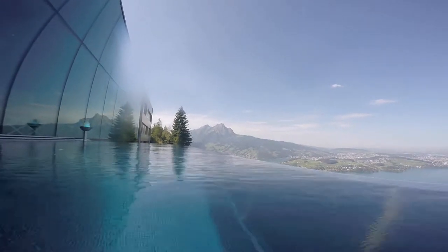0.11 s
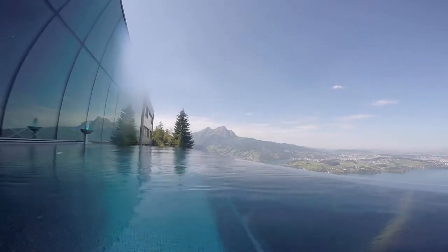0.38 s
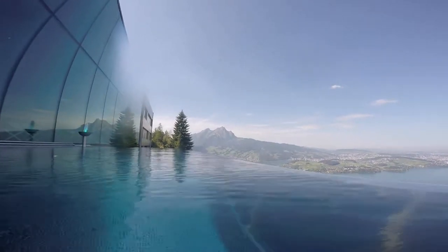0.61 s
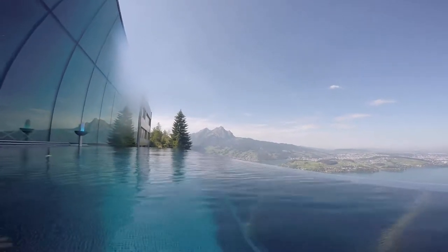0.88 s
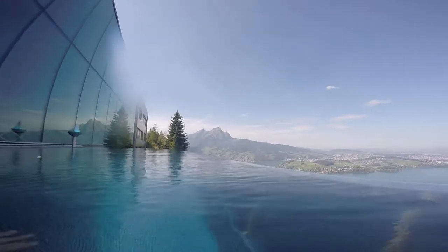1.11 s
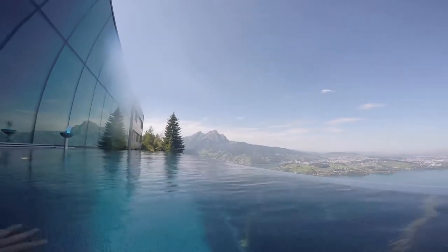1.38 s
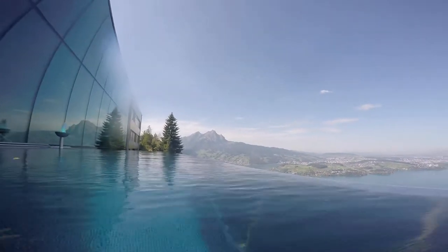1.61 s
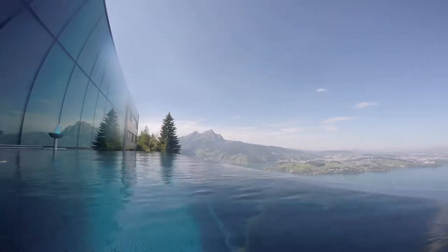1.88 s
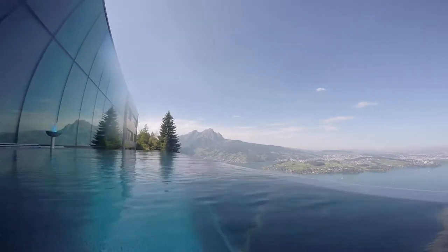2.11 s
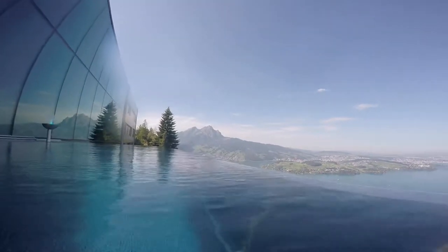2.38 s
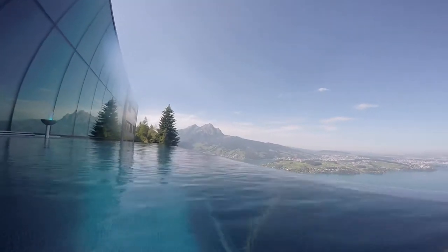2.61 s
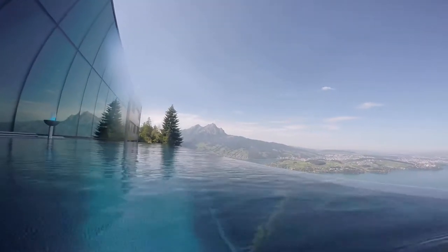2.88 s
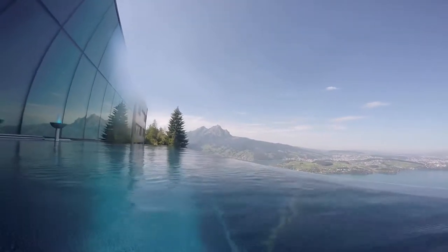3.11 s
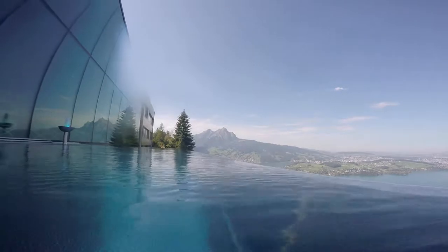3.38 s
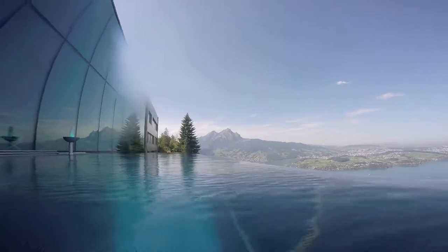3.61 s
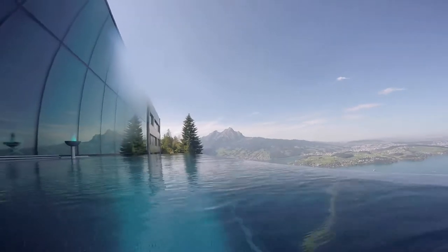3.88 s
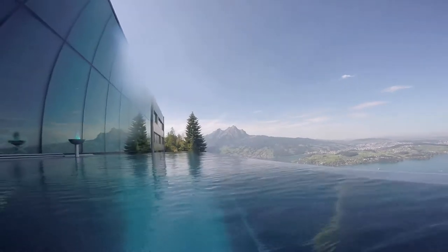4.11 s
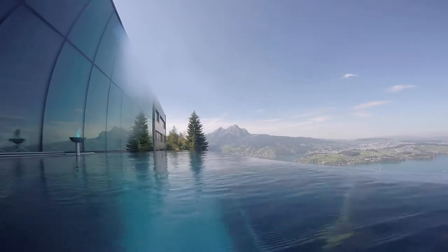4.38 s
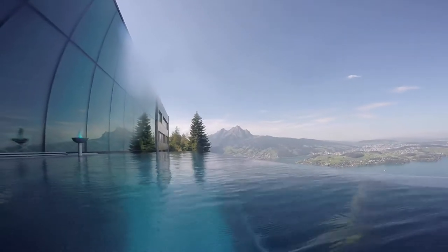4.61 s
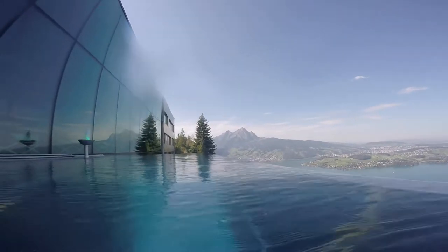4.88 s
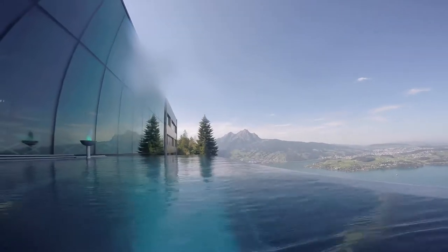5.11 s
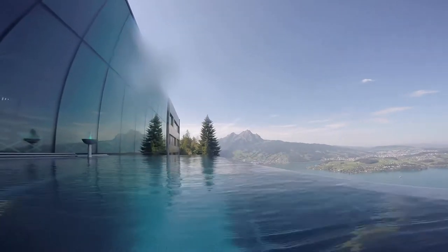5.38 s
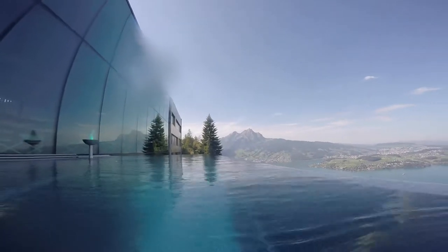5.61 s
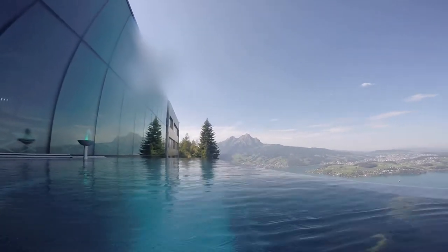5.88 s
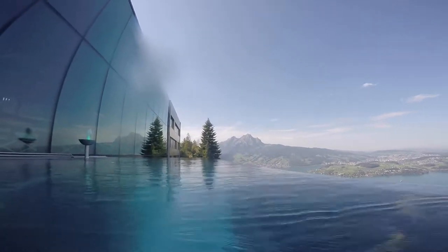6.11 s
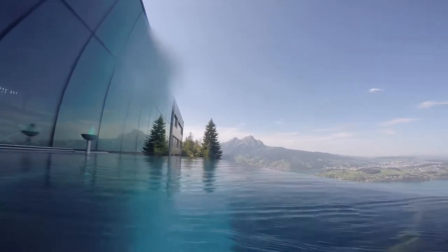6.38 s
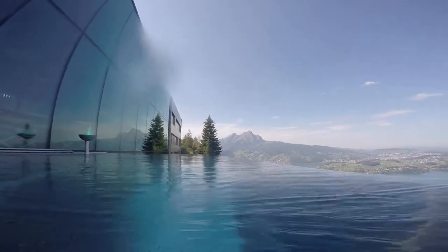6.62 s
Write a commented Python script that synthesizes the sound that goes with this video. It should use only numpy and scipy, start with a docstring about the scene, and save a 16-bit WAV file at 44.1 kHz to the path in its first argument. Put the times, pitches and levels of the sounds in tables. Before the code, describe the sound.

Quiet water spills steadily and fizzes lightly, heard close through a plastic camera case in mono. Single plinking drips and short crackly ticks come irregularly. The hand-held case rocks with deep, quickly damped thuds, sparse at first, a firmer one near the middle, then many in the last second. Grainy wet skin rubs sound on the plastic late, the strongest just after six seconds, over dim low hum and soft hiss.

```python
"""An outdoor pool, heard at the water line by a small camera's microphone in a sealed plastic housing.
Water over the far edge is patchy noise with tiny ringing bubbles; drips are single bubbles, ticks short crackles.
The hand-held housing rumbles as low noise, is nudged (damped low sines) and rubbed (grainy noise through its modes).
Behind it lie a low wavering hum and, from the electronics, smooth hiss and a thin whine of steady sines."""
import sys
import numpy as np
from scipy import signal
from scipy.fft import rfft, irfft, next_fast_len
from scipy.io import wavfile
from scipy.ndimage import uniform_filter1d, map_coordinates

SR = 44100
rng = np.random.default_rng(int(sys.argv[2]) if len(sys.argv) > 2 else 0)


def bounce(signal):
    """Save signal as a 16-bit WAV file at the path given by the first command-line argument."""
    frames = np.transpose(np.atleast_2d(signal))
    limited = np.clip(frames, -1, 1)
    pcm = np.round(limited * 32767).astype(np.int16)
    wavfile.write(sys.argv[1], SR, pcm)


def ratio_of_db(decibels):
    """Turn decibels (scalar or array-like) into linear amplitude factors; 0 dB maps to 1."""
    return 10 ** (np.asarray(decibels, float) / 20)


N = 297234
T = np.arange(N) / SR


def unit(x):
    """Scaled to rms 1."""
    return x / np.sqrt(np.mean(x ** 2) + 1e-20)


def filtered(x, response):
    """x times a response given as a function of frequency in Hz."""
    m = next_fast_len(N + SR // 4)
    return irfft(rfft(x, m) * response(np.fft.rfftfreq(m, 1 / SR)), m)[:N]


def coloured(x, points):
    """x through a (f/Hz, gain/dB) spectrum read on a log frequency axis."""
    f, db = np.transpose(points)
    return filtered(x, lambda hz: ratio_of_db(np.interp(np.log(hz + 1), np.log(f + 1), db)))


def resonant(x, modes):
    """x through causal (f/Hz, width/Hz, gain/dB) resonances, summed with alternating sign."""
    def response(f):
        total = 0
        for k, (centre, width, db) in enumerate(modes):
            damping = 1j * f * width
            total = total + (-1) ** k * ratio_of_db(db) * damping / (centre * centre - f * f + damping)
        return total
    return filtered(x, response)


def curve(points):
    """A (t/s, level/dB) table read at every sample."""
    return np.interp(T, *np.transpose(points))


def wobble(rate):
    """A smooth random curve, rate knots a second."""
    return map_coordinates(rng.standard_normal(int(N * rate / SR) + 4), [T * rate])


def bubbles(start, size, hz, cycles, rise):
    """Damped sines, fading by 1/e in so many cycles; rise > 0 lifts the pitch as a bubble nears the surface."""
    t = np.arange(SR // 40) / SR
    turns = hz[:, None] * t
    tone = np.sin(2 * np.pi * turns * (1 + rise * turns / cycles / 2))
    onset = 1 - np.exp(-turns / 1.5)
    rings = size[:, None] * tone * np.exp(-turns / cycles) * onset
    at = (start * SR).astype(int)[:, None] + np.arange(len(t))
    return np.bincount(at.ravel(), rings.ravel(), N + SR)[:N]


# Water over the far edge, before its random swell: t/s, level/dB
WATER_LEVEL = [(0.0, -60), (2.44, -59.5), (3.0, -59.5), (5.7, -60), (6.1, -60.5), (6.74, -59.5)]
# The water's spectrum through the housing wall: f/Hz, gain/dB
WATER_COLOUR = [(150, -26), (250, -4.5), (490, -3), (582, -6), (1210, -3.5), (1400, -9.5), (1660, 0),
                (2000, -1), (2380, -5.5), (2820, -3), (3050, -7.5), (3560, -9.5), (4240, -7), (5030, -12.5),
                (6670, -12), (7560, -19.5), (10500, -24.5), (13600, -39), (22000, -120)]
# Treble of the water against its usual share, before its random flicker: t/s, level/dB
SPRAY_LEVEL = [(0, -1), (1.3, -.5), (1.6, 0.5), (2.6, 1), (3.0, -1), (5.5, 0.5), (6.74, 1)]
SPRAY_HZ = 3800  # where that treble begins
# Modes of the microphone port, added to the direct path: f/Hz, width/Hz, gain/dB
PORT_MODES = [(5520, 110, -5), (9200, 400, -4)]


def patchy_rush():
    """Noise whose level varies in patches of time and frequency."""
    z = signal.stft(rng.standard_normal(N), nperseg=512)[2]
    patches = uniform_filter1d(rng.standard_normal(z.shape), size=8, axis=0)
    patches = uniform_filter1d(patches, size=10, axis=1)
    return signal.istft(z * ratio_of_db(0.89 * unit(patches)), nperseg=512)[1][:N]


def fizz():
    """1500 tiny bubbles at random times, each ringing somewhere between 1 and 12 kHz."""
    when, pitch, strength = rng.random((1500, 3)).T
    hz = 1000 * 12 ** pitch
    size = ratio_of_db(9.0 * strength ** 3) * np.sqrt(hz)
    return bubbles(when * T[-1], size, hz, cycles=7.0, rise=0.036)


def overflow():
    """A patchy rush with a fizz of tiny bubbles, swelling as wavelets arrive, heard through wall and port."""
    water = coloured(unit(patchy_rush()) + 0.19 * unit(fizz()), WATER_COLOUR)
    treble = filtered(water, lambda f: 1 / (1 + (SPRAY_HZ / (f + 1)) ** 4))
    flicker = ratio_of_db(curve(SPRAY_LEVEL) + 0.94 * wobble(14))
    water = water + (flicker - 1) * treble
    # each port mode is added on its own, so both keep the same sign
    through_port = water + resonant(water, PORT_MODES[:1]) + resonant(water, PORT_MODES[1:])
    swell = ratio_of_db(curve(WATER_LEVEL) + 0.22 * wobble(5.9))
    return swell * unit(through_port)


# Single drips, level before the soft onset: t/s, level/dB, starting bubble f/Hz
DRIP_BUBBLES = [(.3356, -43.5, 2550), (.4648, -53.5, 2600), (.9697, -43, 2800), (1.01, -43, 2650),
                (1.8295, -44, 4410), (1.839, -50, 6600), (1.9914, -48, 4540), (2.161, -49.5, 2760),
                (2.5434, -47, 2180), (2.5516, -44, 2780), (2.617, -51, 7000), (3.213, -48, 6000),
                (3.68, -45.5, 3960), (4.97, -46.5, 4170), (5.518, -51.5, 4300), (5.5682, -46, 3270),
                (5.623, -59, 910), (5.701, -51, 902)]


def drips():
    """Each drip traps one ringing bubble."""
    s, db, hz = np.transpose(DRIP_BUBBLES)
    return bubbles(s, ratio_of_db(db), hz, cycles=5.9, rise=0.034)


# Splash ticks, levels before the resonances:
# t/s, crackle level/dB, strongest ring f/Hz, bright edge over crackle/dB, crackle t60/s
SPLASH_TICKS = [(2.3999, -54, 2930, -22, .03), (2.5316, -48, 2900, -25, .035), (4.372, -66, 6500, -4, .05),
                (5.002, -53, 6300, -23, 0.035), (5.709, -46, 4130, -33, .03), (6.366, -55, 3180, -24, .03),
                (6.571, -48, 4500, -20, .012), (6.606, -52, 3110, -13, .012)]
RING_DB = -2  # a tick's ring against its crackle, both as driven


def ticks():
    """Droplets strike the housing: a short ring, a decaying crackle and a bright edge."""
    crackle, edge, t = np.zeros(N + SR), np.zeros(N + SR), T[:SR // 20]
    for s, db, hz, treble_db, t60 in SPLASH_TICKS:
        at = round(s * SR)
        body_burst, edge_burst = ratio_of_db(db - 60 * t / t60) * rng.standard_normal((2, len(t)))
        crackle[at:][:len(t)] += body_burst
        edge[at:][:len(t)] += ratio_of_db(treble_db) * edge_burst
    s, db, hz, *_ = np.transpose(SPLASH_TICKS)
    ring = bubbles(s, ratio_of_db(db + RING_DB), hz, cycles=12.0, rise=0)
    body = resonant(crackle[:N], [(2900, 760, 4.1), (4300, 2700, 5.0), (6260, 1200, 3.5)])
    return ring + body + resonant(edge[:N], [(9500, 1700, 17)])


# Strokes of a wet finger on the housing:
# t/s of firmest contact, lid level/dB, fading t60/s, shell over lid/dB, cavity over lid/dB
FINGER_STROKES = [(3.713, -65.5, 0.17, 13.5, 5), (5.624, -57.5, 0.077, -2.5, 0.5),
                  (5.707, -56, 0.074, -10, -1.5), (5.745, -65, .3, -16, -7), (5.777, -51, .4, -12, -10),
                  (5.875, -63.5, 0.19, -4, -5), (6.243, -39.5, .16, -5.5, -8), (6.285, -65, 0.11, -14, -6),
                  (6.465, -65, .27, 0, -14), (6.55, -70, .4, 4, -9)]
# Modes of the lid: f/Hz, width/Hz, relative level/dB
LID_MODES = [(2250, 84, 1.5), (2505, 91, 2.5), (2734, 145, -5), (3700, 560, -15.5), (4500, 630, -18),
             (6600, 350, -25), (9800, 4400, -33.5)]
# Mode of the shell: f/Hz, width/Hz, level/dB before scaling to rms 1
SHELL_MODES = [(1782, 410, -2)]
# Modes of the air cavity: f/Hz, width/Hz, relative level/dB of a single pass
CAVITY_MODES = [(158, 192, -2), (763, 207, 0), (970, 280, -2.5)]
PRESS_DB_PER_S, ROUND_S = 752, 0.002  # how fast a stroke presses in; how blunt its top is


def rubs():
    """Skin slips in uneven grains that drive lid, shell and air cavity; a stroke presses in fast and lets go."""
    lid_slip, shell_slip, cavity_slip = ratio_of_db(2.0 * wobble(220)) * rng.standard_normal((3, N))
    lid = unit(resonant(lid_slip, LID_MODES))
    # shell and cavity are passed twice, so their skirts fall steeply
    shell = unit(resonant(resonant(shell_slip, SHELL_MODES), SHELL_MODES))
    cavity = unit(resonant(resonant(cavity_slip, CAVITY_MODES), CAVITY_MODES))
    out = np.zeros(N)
    for s, db, t60, shell_db, cavity_db in FINGER_STROKES:
        away = np.hypot(T - s, ROUND_S) - ROUND_S
        slope = np.where(T < s, PRESS_DB_PER_S, 60 / t60)
        modes = lid + ratio_of_db(shell_db) * shell + ratio_of_db(cavity_db) * cavity
        out += ratio_of_db(db - away * slope) * modes
    return out


# Nudges of the housing, level before the push builds: t/s, level/dB, ring f/Hz, t60/s, push +1 or pull -1
HOUSING_NUDGES = [(0.079, -37.5, 42.6, 0.23, 1), (1.379, -36, 30, 0.11, 1), (1.432, -39, 42.5, 0.14, -1),
                  (2.722, -34.5, 44.7, 0.27, -1), (2.835, -38, 48, 0.18, -1), (3.384, -29.5, 47.4, 0.17, 1),
                  (3.525, -40.5, 47, 0.15, 1), (5.627, -23.5, 37.3, 0.17, -1), (5.702, -31, 40.8, 0.28, 1),
                  (5.783, -30.5, 40.5, 0.1, 1), (6.046, -32.5, 33.8, 0.12, 1),
                  (6.205, -27.5, 20.2, 0.18, -1), (6.236, -26, 42, 0.056, 1), (6.29, -36, 37.7, 0.17, 1),
                  (6.371, -27.5, 32.4, 0.076, -1), (6.602, -30.5, 27.6, 0.23, 1),
                  (6.667, -26, 55, 0.038, 1), (6.692, -23.5, 29.8, 0.065, -1)]
PUSH_SWINGS = 0.17  # time constant of a push's build-up, in swings


def nudges():
    """Each nudge rocks the housing on its grip as a quickly damped low sine."""
    out, t = np.zeros(N + SR), T[:SR // 2]
    for s, db, hz, t60, way in HOUSING_NUDGES:
        build = 1 - np.exp(-t * hz / PUSH_SWINGS)
        rock = np.sin(2 * np.pi * hz * t)
        out[round(s * SR):][:len(t)] += np.sign(way) * ratio_of_db(db - 60 * t / t60) * build * rock
    return out[:N]


# Slow shaking of the housing: t/s, level/dB
SWAY_LEVEL = [(0.0, -52.5), (0.2, -54.5), (0.35, -55.5), (0.9, -55.5), (1.5, -56), (2.38, -56), (2.72, -49),
              (2.93, -58.5), (3.45, -51.5), (4.02, -55), (4.55, -56.5), (4.97, -53), (5.42, -58),
              (5.8, -43), (6.0, -52.5), (6.34, -43), (6.67, -50), (6.74, -41.5)]
# Spectrum of the shaking: f/Hz, gain/dB
SWAY_SPECTRUM = [(9, -17), (15, -0.5), (39, -2.5), (60, -9), (85, -18.5), (130, -25), (200, -33.5),
                 (400, -54), (900, -120)]


def sway():
    """The hand and the water shake the housing, mostly below 100 Hz, in lumps."""
    lumps = ratio_of_db(1.1 * wobble(15)) * rng.standard_normal(N)
    return ratio_of_db(curve(SWAY_LEVEL)) * unit(coloured(lumps, SWAY_SPECTRUM))


# Pumps and distant valley: f/Hz, gain/dB
DRONE_SPECTRUM = [(30, -23), (70, 0), (150, -4.5), (250, -13), (330, -17), (600, -55), (1200, -120)]


def drone():
    """A wavering low hum of pumps and far air: low noise at -65 dB rms."""
    waver = ratio_of_db(0.84 * wobble(3.7) + 2.0 * wobble(14))
    return ratio_of_db(-65) * unit(coloured(waver * rng.standard_normal(N), DRONE_SPECTRUM))


# Circuit tones, the strongest with side tones at multiples of 30 Hz from it: f/Hz, level/dB rms
CIRCUIT_TONES = [(6293.5, -89), (12617.4, -76), (12587.4, -94), (12557.4, -97), (12527.4, -100),
                 (12497.4, -103), (12467.4, -102), (12677.4, -103)]
# Spectrum of the preamplifier hiss: f/Hz, gain/dB
HISS_SPECTRUM = [(200, -3.5), (7000, -2.5), (12000, -2.5), (15200, -3.5), (20000, -8)]


def electronics():
    """Smooth preamplifier hiss and steady circuit tones."""
    hiss = ratio_of_db(-72.0) * unit(coloured(rng.standard_normal(N), HISS_SPECTRUM))
    tones = np.zeros(N)
    for hz, db in CIRCUIT_TONES:
        tones += np.sqrt(2) * ratio_of_db(db) * np.sin(2 * np.pi * (hz * T + rng.random()))
    return hiss + tones


def scene():
    """Water, housing, background and electronics together, on one channel."""
    water = overflow() + drips() + ticks()
    housing = rubs() + nudges() + sway()
    return (water + housing + drone() + electronics())[None]


def band_limit(x):
    """A steep low-pass at the top of the band."""
    return signal.sosfilt(signal.butter(12, 15240, fs=SR, output="sos"), x)


TOP_HZ = 15300  # nothing passes above this


def record(dry):
    """The camera's microphone channel, cut off sharply at the top of its band."""
    mix = filtered(dry[0], lambda hz: hz < TOP_HZ)[None]
    return band_limit(mix)


dry = scene()
out = record(dry)
bounce(out)
```